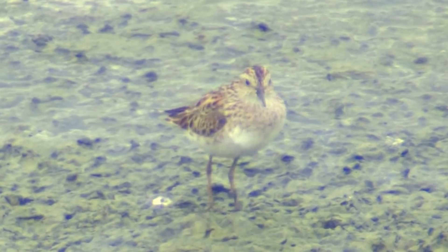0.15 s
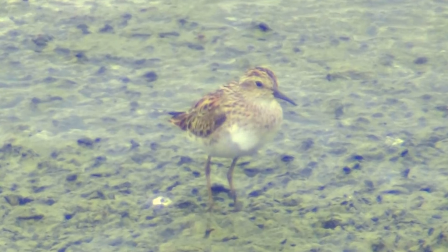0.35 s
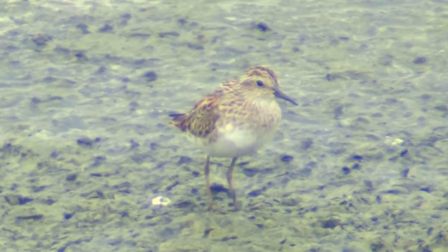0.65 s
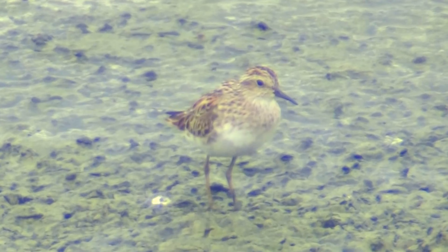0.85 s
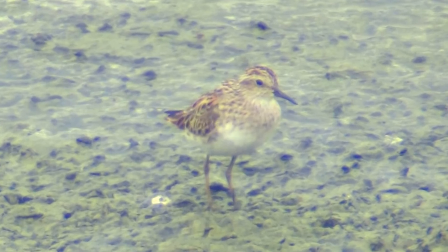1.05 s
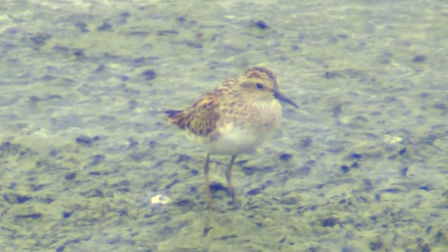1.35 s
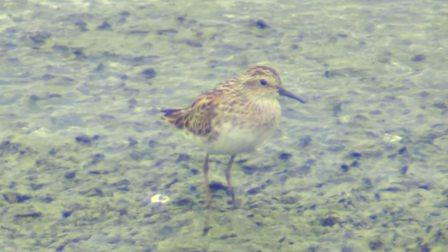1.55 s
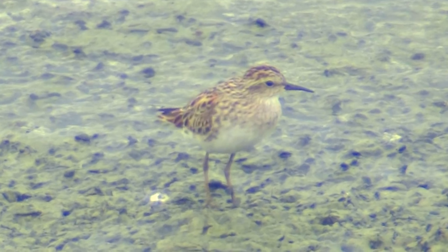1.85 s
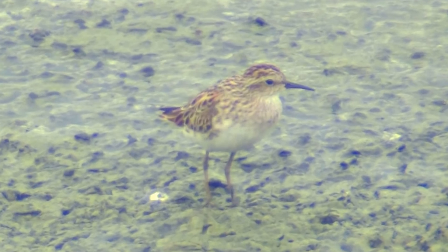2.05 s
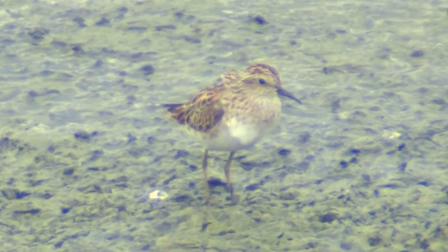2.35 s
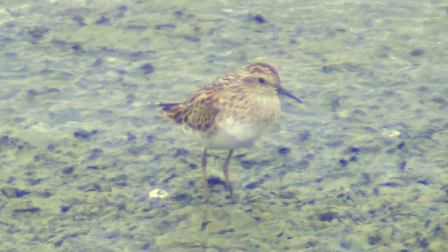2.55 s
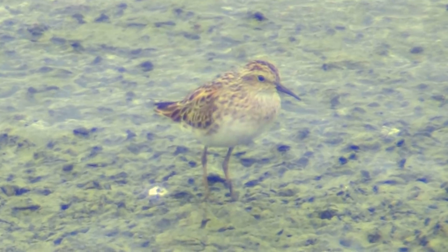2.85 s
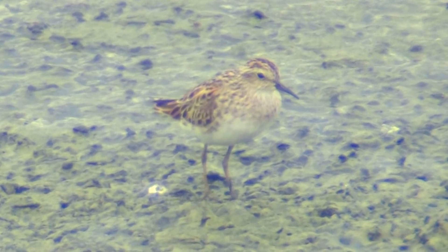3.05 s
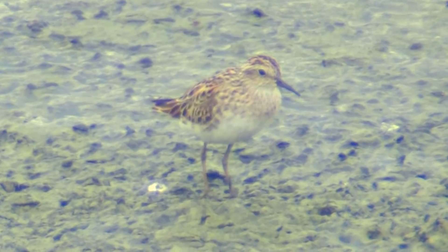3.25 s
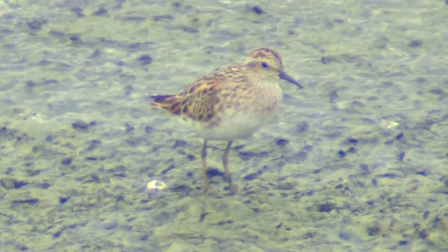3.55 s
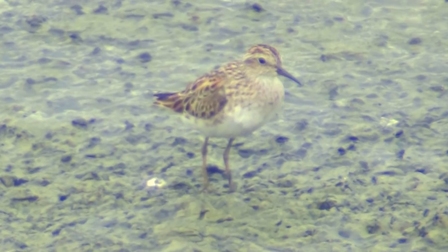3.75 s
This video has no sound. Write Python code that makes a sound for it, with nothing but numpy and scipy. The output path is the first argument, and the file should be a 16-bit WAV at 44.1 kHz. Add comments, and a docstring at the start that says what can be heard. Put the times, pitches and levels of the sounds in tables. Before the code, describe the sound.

Small shorebird calls: one quick slurred whistle, then three short rippling trills, on an open mudflat. Low wind and far surf rumble with a faint engine drone; small metal fittings tick and jingle close to the stereo microphone.

```python
"""Small shorebirds call on an open mudflat: gliding sines make a slurred whistle, short trills, faint far
notes and a far buzzy trill. A distant engine drones as a few wavering orders under wind and far surf,
which are coloured noise. Small metal fittings near the microphone tick and jingle as struck modes,
noise cracks and a faint rattle; one dull knock is a click into short modes."""
import sys
import numpy as np
from scipy import signal
from scipy.fft import rfft, irfft
from scipy.io import wavfile

SR = 44100
rng = np.random.default_rng(int(sys.argv[2]) if len(sys.argv) > 2 else 0)


def to_wav(s):
    """Save 16-bit WAV."""
    ch = np.atleast_2d(s).T  # columns
    pcm = np.round(np.clip(ch, -1, 1) * 32767)  # PCM
    wavfile.write(sys.argv[1], SR, pcm.astype(np.int16))


def undo_db(level):
    """Turn decibels back into plain size, where 20 dB means ten times bigger."""
    steps = np.asarray(level, float) / 20
    return 10 ** steps


N = 172431


def rms_one(x):
    """Scale to rms 1."""
    return x / np.sqrt(np.mean(x ** 2) + 1e-20)


def in_time(rows):
    """Table columns interpolated over time; the first column is time_s."""
    time_s, *columns = np.transpose(rows)
    return [np.interp(np.arange(N) / SR, time_s, column) for column in columns]


def at_hz(points, hz):
    """Read a spectrum table on a log frequency axis."""
    point_hz, point_db = np.transpose(points)
    return np.interp(np.log(hz + 1), np.log(point_hz + 1), point_db)


def drift(corner_hz):
    """Random drift of rms 1: noise at SR / 40 through two equal poles, interpolated."""
    pole = np.exp(-80 * np.pi * corner_hz / SR)
    noise = rng.standard_normal(N // 40 + 2002)
    slow = signal.lfilter([1], [1, -2 * pole, pole * pole], noise)[2000:]  # settled part
    return np.interp(np.arange(N) / 40, np.arange(len(slow)), rms_one(slow))


def ring(clicks, hz, t60_s):
    """Two-pole resonator: a unit click starts a decaying sine of height 1."""
    radius, angle = undo_db(-60 / (t60_s * SR)), 2 * np.pi * hz / SR
    feedback = [1, -2 * radius * np.cos(angle), radius * radius]
    return signal.lfilter([0, np.sin(angle)], feedback, clicks + 1e-18)


def shaped(x, db_points):
    """Filter by a spectrum table, zero phase."""
    return irfft(rfft(x) * undo_db(at_hz(db_points, np.fft.rfftfreq(N, 1 / SR))), N)


def tone(hz):
    """Sine of rms 1 along a pitch signal."""
    return np.sqrt(2) * np.sin(2 * np.pi * np.cumsum(hz) / SR)


def capsule_hiss():
    """Coloured noise, the part of the hiss that differs between the capsules."""
    # spectrum shape: freq_hz, density_db [Hz, dB per Hz]
    wide_spectrum = [(12, -51), (20, -32), (85, -20), (108, -4), (123, -7.5), (180, -5), (268, -7),
                     (307, -8), (471, -28), (583, -8), (703, -17), (826, -14), (919, -16), (1270, -20),
                     (1410, -14), (1610, -39), (1790, -27), (2160, -32), (2410, -59), (3500, -29.5),
                     (4110, -47), (5980, -28), (8250, -36.5), (10500, -35), (12000, -55), (15600, -88),
                     (22000, -120)]
    return undo_db(-60.5) * rms_one(shaped(rng.standard_normal(N), wide_spectrum))


def treble_hiss():
    """Steady coloured noise in the treble."""
    # spectrum shape: freq_hz, density_db [Hz, dB per Hz]
    hiss_spectrum = [(2650, -29), (4500, -5.5), (5180, -4), (5400, -0.5), (5840, -3), (6150, 1), (6340, 1),
                     (6640, -10), (7220, -3.5), (8270, -5), (8980, -8), (9610, -17.5), (9970, -7.5),
                     (10400, -1), (11100, -14.5), (12100, -11), (13400, -14), (14600, -21), (15600, -18)]
    return undo_db(-57) * rms_one(shaped(rng.standard_normal(N), hiss_spectrum))


def wind_and_surf():
    """Coloured noise; the lows follow the gusts, the rest swells a little with the far surf."""
    # wind and far surf spectrum shape: freq_hz, density_db [Hz, dB per Hz]
    air_spectrum = [(25, -36), (42, -3.5), (49, -8.5), (65, -6), (123, -7), (144, -5.5), (179, -4.5),
                    (205, -6.5), (221, -7), (269, -6.5), (315, -14), (347, -12), (414, -16), (503, -17),
                    (612, -13), (675, -17), (837, -11), (941, -15.5), (1170, -20), (1340, -24), (1600, -22),
                    (2360, -22), (2760, -28), (3490, -25.5), (4500, -41), (5850, -70), (9900, -120)]
    # rumble level, used relative to its mean: time_s, level_db [s, dB]
    gust_course = [(0.0, -36), (0.08, -38), (1.77, -36.5), (1.82, -35), (2.93, -38.5), (2.95, -35.5),
                   (3.57, -34), (3.91, -37.5)]
    gust_db, = in_time(gust_course)
    gust_top_hz = 390
    noise = undo_db(-39) * rms_one(shaped(rng.standard_normal(N), air_spectrum))
    low = signal.sosfiltfilt(signal.butter(2, gust_top_hz, fs=SR, output="sos"), noise)
    gusts = undo_db(gust_db - gust_db.mean() + 0.47 * drift(13))
    swell = undo_db(0.4 * drift(6))
    return low * gusts + (noise - low) * swell


def engine():
    """Sines at a few low orders, each wavering in pitch and level."""
    # pitch of the fifth order: time_s, pitch_hz [s, Hz]
    fifth_order = [(0.0, 121.4), (0.82, 119.6), (2.71, 121.3), (2.78, 123.1), (3.83, 123.3), (3.91, 118.6)]
    # orders of the drone: order, level_db [number, dB rms before wavering]
    order_levels = [(1, -51), (5, -45), (7, -56)]
    fifth_hz, = in_time(fifth_order)
    out = 0
    for order, level_db in order_levels:
        waver_db = 2.0 * drift(1.7)
        hz = fifth_hz * order / 5 * (1 + 0.0055 * drift(4.6))
        out = out + undo_db(level_db + waver_db) * tone(hz)
    return out


def knock():
    """One click into a few short modes."""
    # modes: freq_hz, level_db, t60_s [Hz, dB, s]
    knock_modes = [(1020, -9, .025), (1590, 0, .016), (2100, -5, .01), (3000, -11, .008), (4400, -18, .006),
                   (6300, -16, .008)]
    start_s, click_db = .7543, -27
    click = np.zeros(N)
    click[int(start_s * SR)] = undo_db(click_db)
    return sum(undo_db(level_db) * ring(click, hz, t60_s) for hz, level_db, t60_s in knock_modes)


def fittings():
    """Ticks strike modes at random strengths and add a dying noise crack; rattle and rustle fill in."""
    # ticks: time_s, level_db, low_band_db, top_band_db [s, dB, dB re level, dB re level]
    tick_rows = [(0.0248, -53, -5, -16), (0.0456, -47, -6, -17), (0.2159, -33.5, -12, -9),
                 (0.2862, -50, -7, -18), (0.3405, -36.5, 0, -19), (0.4194, -54, -8, -17),
                 (0.4269, -53, -7, -17), (0.5514, -41.5, 4, -16), (0.6025, -52, -6, -16),
                 (0.7008, -50, -9, -16), (0.7367, -51, 2, -13), (0.755, -46, 4, -20),
                 (0.7991, -54, -7, -18), (0.853, -51, -4, -14), (0.8844, -37, -3, -16),
                 (0.9283, -41, -2, -20), (0.9617, -47, -4, -17), (1.0181, -42.5, 2, -17),
                 (1.0665, -53, -4, -18), (1.1129, -37.5, -11, -7), (1.2092, -37.5, -10, -15),
                 (1.2495, -36.5, 1, -15), (1.297, -48, -5, -15), (1.297, -41, -9, -9),
                 (1.3119, -34, -5, -17), (1.3483, -41, -6, -14), (1.3588, -45, -6, -14),
                 (1.3773, -43, -10, -18), (1.3882, -43, -6, -15), (1.4162, -40, -15, -13),
                 (1.4745, -48, -8, -13), (1.515, -54, -7, -13), (1.5344, -40, -5, -7),
                 (1.5454, -42, -14, -13), (1.5858, -43, -11, -16), (1.5978, -44, 3.5, -13),
                 (1.6402, -39, 0, -16), (1.6571, -42, 2, -15), (1.72, -39, 1.5, -19),
                 (1.7469, -55, -6, -10), (1.7649, -45, -6, -15), (1.7838, -37.5, -1, -16),
                 (1.8227, -35.5, -1, -17), (1.8572, -35.5, -1, -19), (1.9106, -47, -8, -17),
                 (1.921, -47, -6, -15), (1.939, -41, -3, -16), (1.952, -36, -3, -16),
                 (2.0063, -48, -10, -19), (2.0892, -46, 2, -18), (2.1076, -46, -4, -15),
                 (2.1304, -42, 0, -15), (2.1467, -35, -1, -17), (2.1787, -42, 0, -15),
                 (2.2009, -49, -6, -14), (2.2218, -47, -7, -13), (2.2353, -45, -10, -14),
                 (2.2752, -53, -8, -9), (2.2967, -37.5, -4, -13), (2.3331, -55, -5, -12),
                 (2.3471, -36, 1, -17), (2.383, -39, -7, -19), (2.4082, -39, -1, -16),
                 (2.4568, -42, 0, -16), (2.5007, -40, 1.5, -18), (2.5461, -37.5, -1.5, -19),
                 (2.5795, -42, -2, -18), (2.6254, -46, -8, -12), (2.6429, -40.5, -0.5, -15),
                 (2.6748, -50, -7, -18), (2.7781, -51, -7, -17), (2.8908, -51, -1, -17),
                 (2.8988, -49, -5, -20), (2.9442, -50, -9, -20), (2.9826, -52, -9, -17),
                 (3.034, -44, -6, -17), (3.1467, -45, -10, -15), (3.2161, -40.5, -1, -18),
                 (3.2375, -45, -11, -17), (3.272, -46, -7, -13), (3.4381, -44, 0, -8),
                 (3.451, -40, 2.5, -15), (3.4685, -44, -10, -16), (3.5009, -41.5, 2.5, -19),
                 (3.5263, -42.5, 1, -18), (3.5768, -50, -8, -18), (3.6232, -46, -7, -18),
                 (3.678, -43.5, 4, -16), (3.7214, -51, -9, -18), (3.7953, -52, -10, -18)]
    # metal modes: freq_hz, level_db, t60_s [Hz, dB, s]
    metal_modes = [(5000, -8, .03), (5870, -6, .03), (6190, -2, .04), (6775, -3, .05), (7075, -3, .05),
                   (7430, -8, .03), (8010, -8, .04), (9000, -8, .03), (9465, -3, .04), (9900, -2, .045),
                   (10400, -4, .04), (11400, -6, .04), (11760, -4, .05), (12150, -6, .04),
                   (12650, -9, .035), (13510, -11, .04)]
    # continuous rattle: time_s, level_db [s, dB]
    rattle_course = [(0.0, -56), (0.53, -57.5), (1.23, -56), (1.43, -49), (1.6, -65), (1.75, -54.5),
                     (2.16, -58.5), (2.33, -57), (2.8, -59.5), (2.98, -61), (3.35, -59), (3.91, -59)]
    split_hz, top_hz = 8500, 12900
    ring_db, mode_spread_db = -12.5, 4
    crack_db, crack_rise_s, crack_t60_s = -12.5, 0.0023, 0.056
    rattle_per_s, rattle_damping = 610, .6  # clicks per mode; share of each mode's t60
    rattle_part_db, rustle_part_db = -2.5, -8.5

    time_s, tick_db, low_db, top_db = np.transpose(tick_rows)
    at = (time_s * SR).astype(int)
    rattle_db, = in_time(rattle_course)
    ticks, rattle, rustle = 0, 0, 0
    for hz, mode_db, t60_s in metal_modes:
        luck_db = mode_spread_db * rng.standard_normal(len(at))
        clicks = np.zeros(N)
        clicks[at] = undo_db(tick_db + mode_db + ring_db + luck_db + low_db * (hz < split_hz))
        ticks = ticks + ring(clicks, hz, t60_s)
        hits = rng.random(N) < rattle_per_s / SR
        hit_db = 2.1 * np.minimum(rng.exponential(1, N), 3) + mode_db
        hits = hits * undo_db(hit_db) * rng.standard_normal(N)
        rattle = rattle + ring(hits, hz, t60_s * rattle_damping)

    rise = np.exp(-1 / (crack_rise_s * SR))
    fall = undo_db(-60 / (crack_t60_s * SR))
    # freq range [Hz], crack tilt [dB], rustle level [dB]
    bands = (([4600, split_hz], low_db, -3),
             ([split_hz + 500, top_hz], 0 * tick_db, 0),
             ([top_hz, 15500], top_db + 6, -5))
    for band_hz, tilt_db, rustle_db in bands:
        clicks = np.zeros(N)
        clicks[at] = undo_db(tick_db + crack_db + tilt_db)
        fade = signal.lfilter([1 - rise], np.convolve([1, -rise], [1, -fall]), clicks + 1e-18)
        bandpass = signal.butter(2, band_hz, "band", fs=SR, output="sos")
        noise = rms_one(signal.sosfilt(bandpass, rng.standard_normal((2, N))))
        ticks = ticks + fade * noise[0] * undo_db(1.8 * drift(160))
        rustle = rustle + undo_db(rustle_db + 2.0 * drift(43)) * noise[1]
    fill = undo_db(rattle_part_db) * rms_one(rattle) + undo_db(rustle_part_db) * rms_one(rustle)
    return ticks + undo_db(rattle_db) * fill


def unequal_scatter(ticks):
    """The housing scatters the ticks unequally to the capsules: a 2 ms noise filter, then a band shape."""
    scatter = rng.standard_normal(int(.002 * SR))
    scattered = signal.lfilter(scatter / np.linalg.norm(scatter), [1], ticks)
    return undo_db(-12) * shaped(scattered, [(4000, -34), (5000, -2), (10500, -2), (11500, -10)])


def far_buzz():
    """A far buzzy trill: a sagging sine in 128 pulses per second under one swell."""
    start_s, length_s, start_hz, sag_hz, pulses_per_s = 1.058, .115, 5320, 350, 128
    t = np.arange(N) / SR
    progress = np.clip((t - start_s) / length_s, 0, 1)
    pulses = np.cos(np.pi * pulses_per_s * t) ** 6
    hz = start_hz - sag_hz * progress + 70 * drift(150)
    return undo_db(-50) * np.sin(np.pi * progress) * pulses * tone(hz)


def trill_notes():
    """Near-sine notes that glide, swell and cut off, with fluttering level and wobbling pitch."""
    # trill and far notes: start_s, length_s, start_hz, end_hz, level_db [s, s, Hz, Hz, dB]
    note_rows = [(1.200, .003, 2600, 2550, -43), (1.2092, .004, 2560, 2500, -41),
                 (1.218, .004, 2540, 2480, -41), (1.228, .004, 2550, 2500, -40),
                 (1.2365, .007, 2500, 2460, -40), (1.246, .008, 2510, 2460, -37),
                 (1.256, .009, 2440, 2400, -35), (1.2665, .0095, 2360, 2330, -32),
                 (1.277, .0125, 2310, 2290, -34), (1.290, .0135, 2200, 2170, -37),
                 (1.305, .006, 2110, 2060, -39), (1.3115, .005, 2070, 2000, -41),
                 (1.318, .016, 1950, 1830, -44), (1.824, .051, 2910, 2860, -49),
                 (1.878, .022, 2840, 2750, -49), (1.905, .027, 2620, 2500, -43),
                 (1.955, .036, 5300, 5520, -50), (2.007, .006, 2500, 2350, -45),
                 (2.017, .004, 2200, 2200, -42), (2.022, .013, 2330, 2370, -39),
                 (2.038, .019, 2330, 2250, -38), (2.061, .018, 2390, 2290, -36),
                 (2.082, .020, 2400, 2270, -36), (2.104, .024, 2360, 2260, -35),
                 (2.353, .022, 3070, 2980, -42), (2.381, .021, 3020, 2940, -41),
                 (2.405, .013, 2940, 3000, -42), (2.430, .026, 2620, 2480, -42),
                 (2.549, .018, 2380, 2460, -42), (2.569, .022, 2470, 2310, -39),
                 (2.594, .020, 2440, 2330, -40), (2.616, .021, 2400, 2340, -37),
                 (2.639, .010, 2400, 2290, -40), (2.541, .006, 2450, 2300, -49),
                 (2.853, .008, 3600, 3750, -52), (2.872, .007, 3750, 3600, -51),
                 (.660, .019, 3850, 4250, -52), (1.990, .012, 5300, 3500, -57),
                 (2.320, .018, 4200, 4700, -62), (2.490, .009, 4600, 5450, -59),
                 (2.499, .026, 5500, 5550, -62), (2.525, .006, 5400, 4600, -60),
                 (1.946, .008, 4700, 5200, -58), (1.824, .020, 5850, 5750, -57),
                 (1.882, .016, 5680, 5550, -57), (2.418, .014, 3250, 3050, -52),
                 (2.650, .012, 2300, 2150, -49)]
    rise_s, fall_s = .004, .002
    out = np.zeros(N)
    flutter = undo_db(1.7 * drift(130))
    wobble_hz = 22 * drift(47)
    for start_s, length_s, start_hz, end_hz, level_db in note_rows:
        t = np.arange(int(length_s * SR)) / SR
        first = int(start_s * SR)
        span = slice(first, first + len(t))
        hz = start_hz + (end_hz - start_hz) * t / length_s + wobble_hz[span]
        ramp = np.minimum(t / min(rise_s, length_s / 2), (length_s - t) / fall_s)
        shape = np.sin(np.pi / 2 * np.clip(ramp, 0, 1))
        out[span] += undo_db(level_db) * shape * tone(hz)
    return flutter * out


def slurred_whistle():
    """A sine and its octave overtone along one up-and-down glide."""
    # glide: time_s, pitch_hz, level_db, octave_db [s, Hz, dB rms, dB rms]
    slur_course = [(.653, 2454, -52, -75), (.658, 2520, -45, -65), (.67, 2730, -50, -65),
                   (.677, 2943, -47, -48), (.681, 2990, -46, -60), (.688, 3126, -50, -49),
                   (.694, 3200, -47, -56), (0.701, 2970, -37.5, -73), (.706, 2875, -34.5, -77),
                   (.709, 2740, -43, -75), (.716, 2643, -38, -80), (.73, 2420, -33, -80),
                   (.738, 2290, -35.5, -80), (.744, 2220, -45, -80), (.749, 2350, -52, -80)]
    hz, level_db, octave_db = in_time(slur_course)
    t = np.arange(N) / SR
    ramp_s = np.minimum(t - slur_course[0][0], slur_course[-1][0] - t)
    on = np.clip(ramp_s / .004, 0, 1)
    return on * (undo_db(level_db) * tone(hz) + undo_db(octave_db) * tone(2 * hz))


def birds():
    """Notes and whistle with scatter off the ground (decaying noise as echo), plus the dry far buzz."""
    calls = trill_notes() + slurred_whistle()
    echo_db, echo_t60_s = -15, .1
    t = np.arange(SR // 5) / SR
    scatter = rng.standard_normal(len(t)) * undo_db(-60 * t / echo_t60_s)
    echo = signal.fftconvolve(calls, scatter / np.linalg.norm(scatter))[:N]
    return calls + undo_db(echo_db) * echo + far_buzz()


def scene():
    """All sources from the front, plus what differs between the capsules in opposite sign."""
    ticks = fittings()
    front = treble_hiss() + wind_and_surf() + engine() + knock() + ticks + birds()
    side = capsule_hiss() + unequal_scatter(ticks)
    return front + side * np.array([[1], [-1]])


def low_pass(x):
    """Removes everything above the highest recorded frequency."""
    return signal.sosfilt(signal.butter(12, 15730, fs=SR, output="sos"), x)


def record(dry):
    """Two close capsules whose sensitivities differ by frequency, half the difference on each."""
    # capsule mismatch: freq_hz, left_minus_right_db [Hz, dB]
    capsule_lean = [(25, 1), (60, 2.3), (160, 4), (340, 0), (600, -5.2), (800, -1), (1000, .7), (1280, 2.3),
                    (1400, 6.2), (1600, .4), (1800, 1.6), (2150, .7), (2450, 2.7), (2680, 4.8), (2880, .7),
                    (3050, 3), (3380, -1.8), (3750, 0), (4500, 0), (5200, .7), (6300, 0), (7050, 1.4),
                    (7400, .4), (11000, .2), (11500, 0)]
    lean = np.array(capsule_lean)
    left = shaped(dry[0], lean * [1, .5])
    right = shaped(dry[1], lean * [1, -.5])
    return low_pass(np.array([left, right]))


dry = scene()
out = record(dry)
to_wav(out)
```